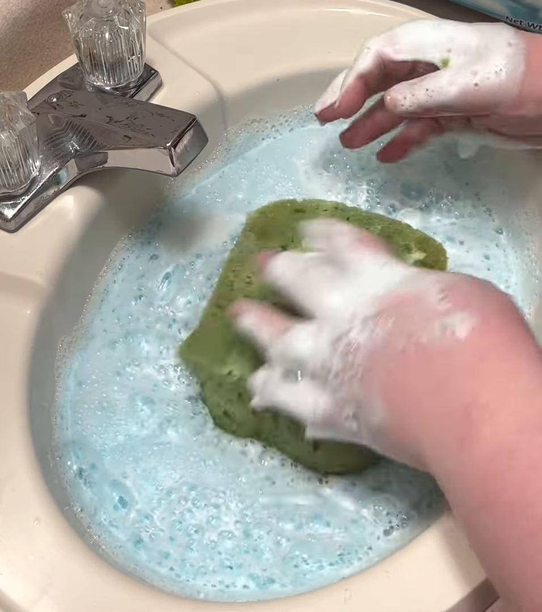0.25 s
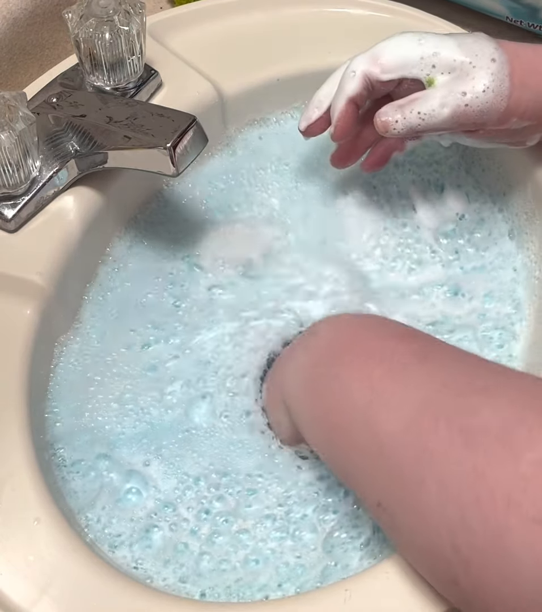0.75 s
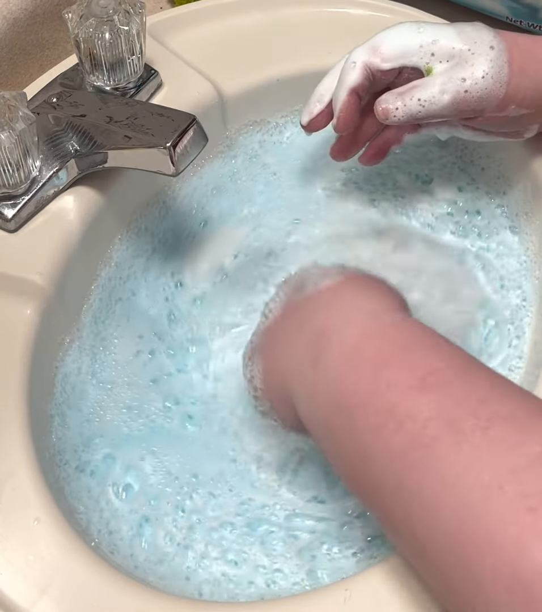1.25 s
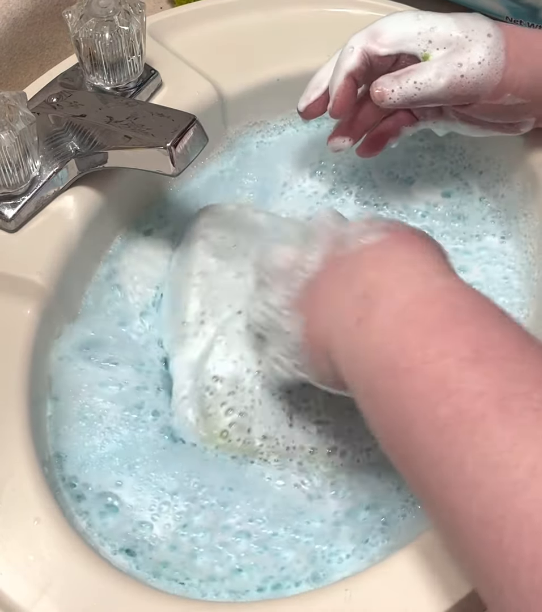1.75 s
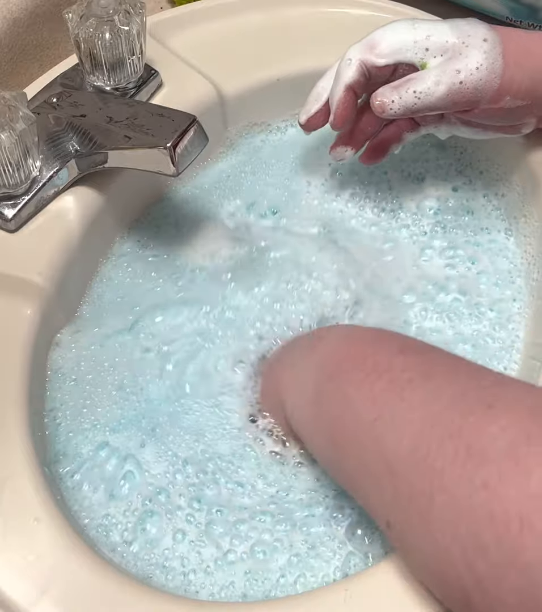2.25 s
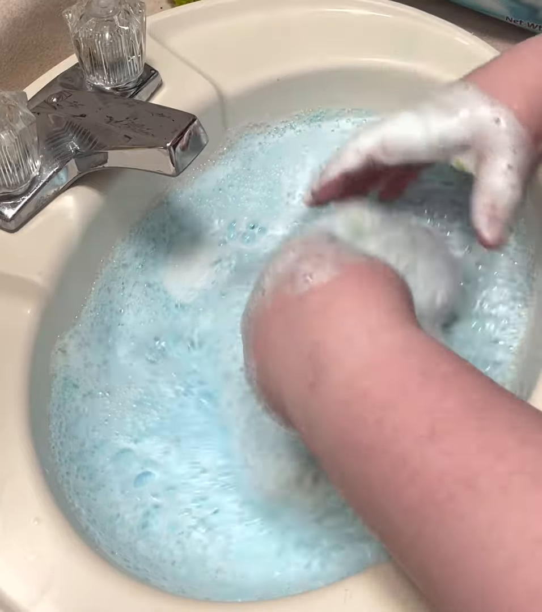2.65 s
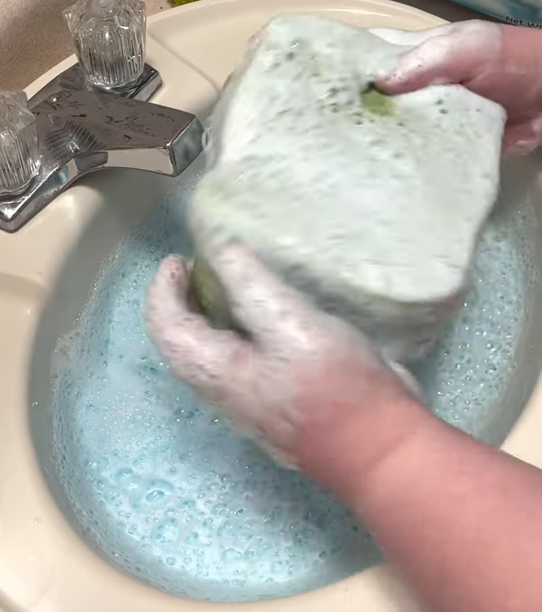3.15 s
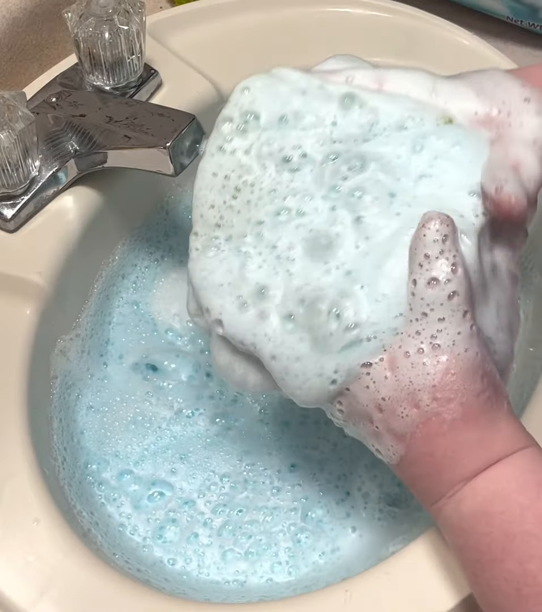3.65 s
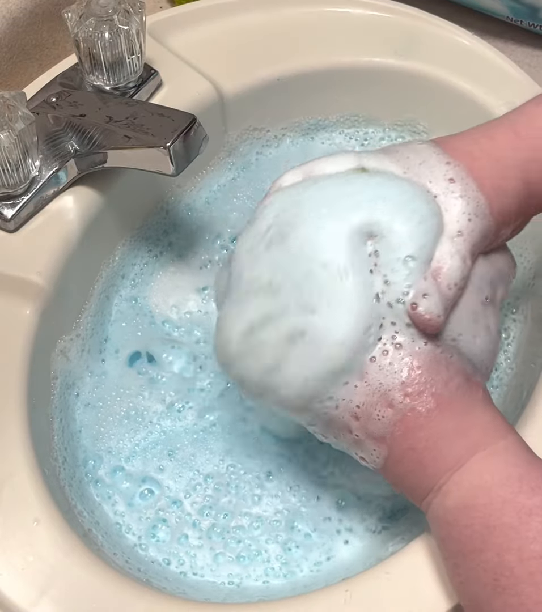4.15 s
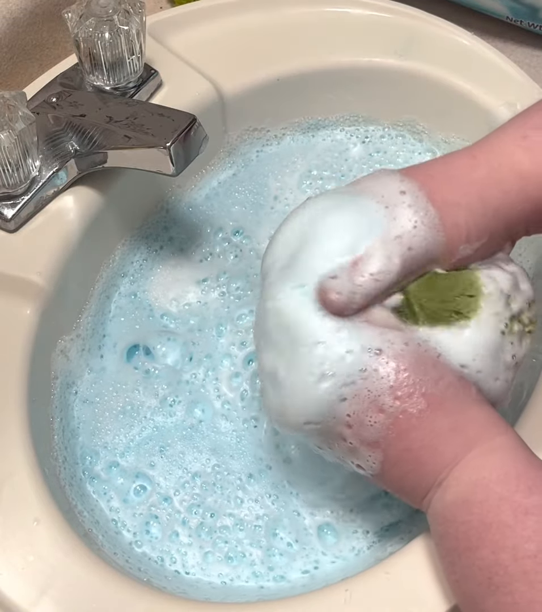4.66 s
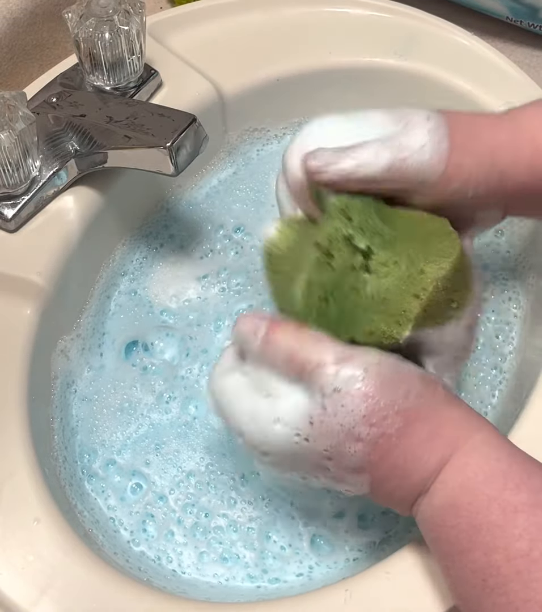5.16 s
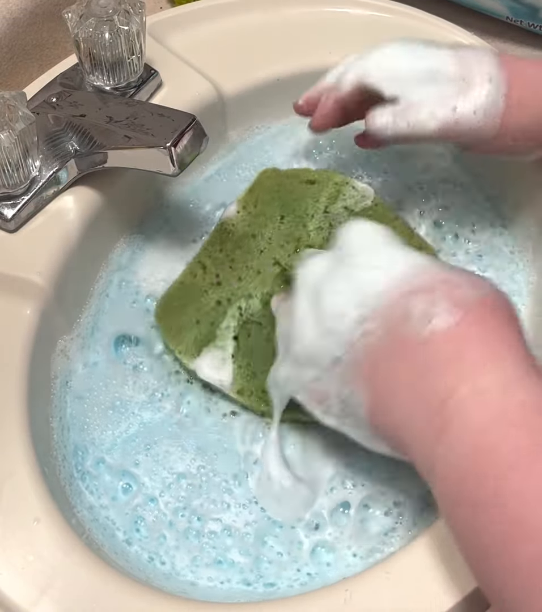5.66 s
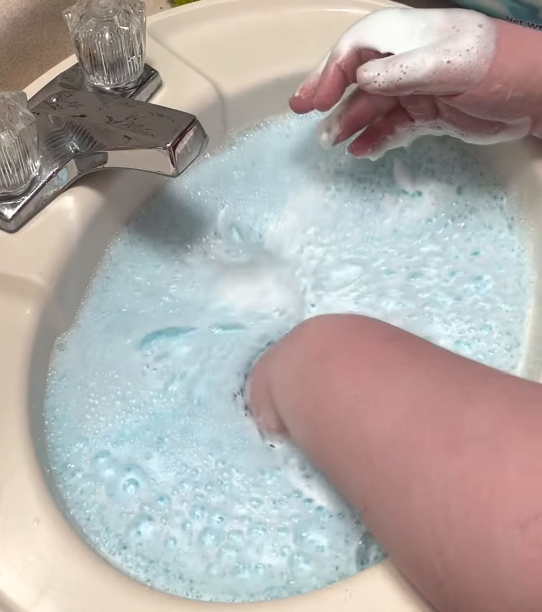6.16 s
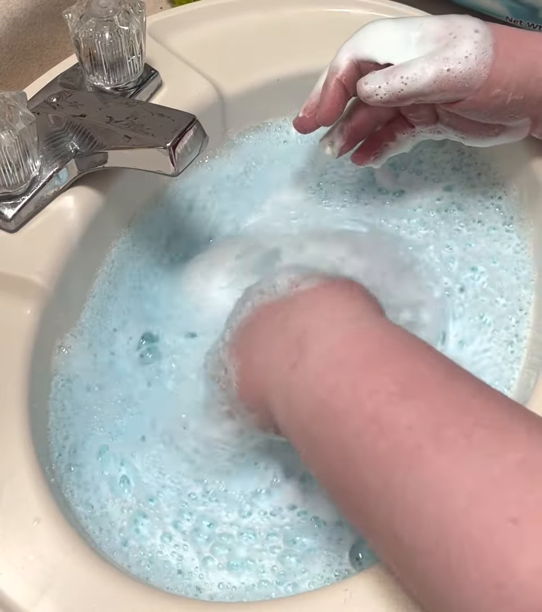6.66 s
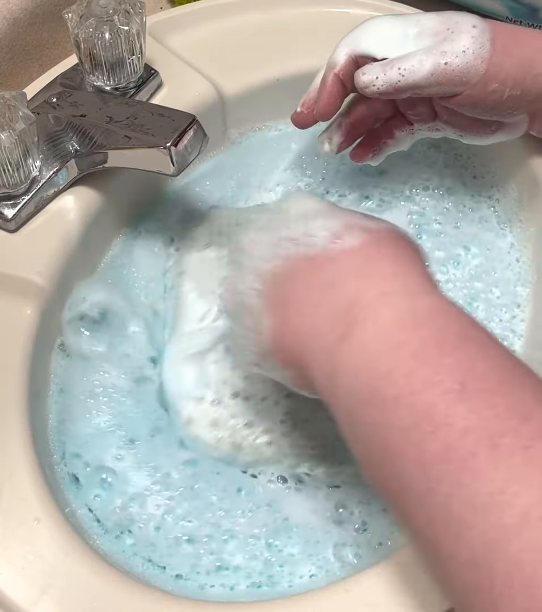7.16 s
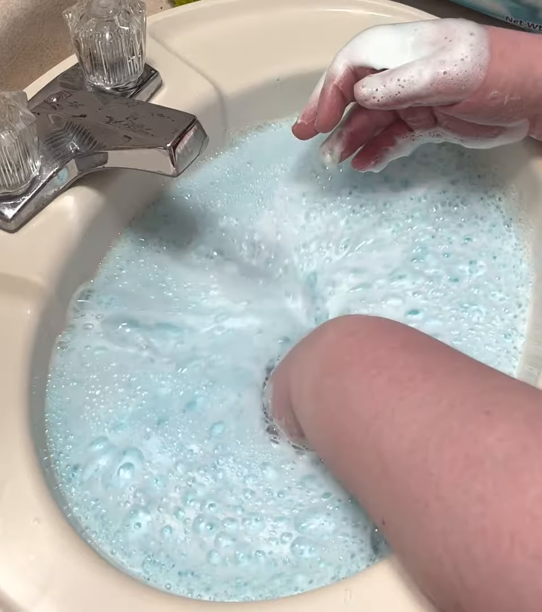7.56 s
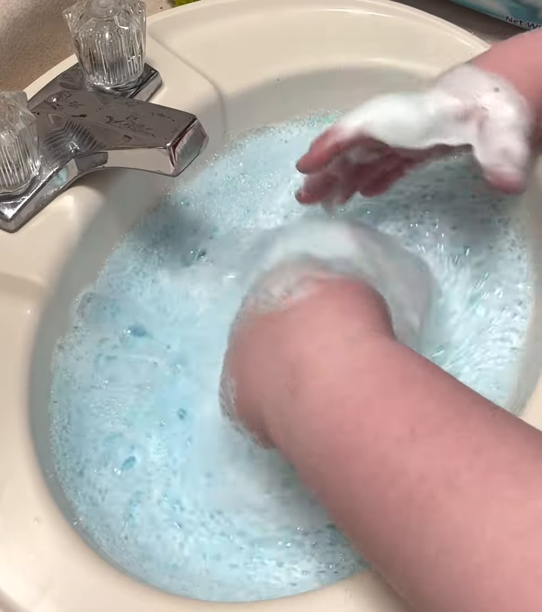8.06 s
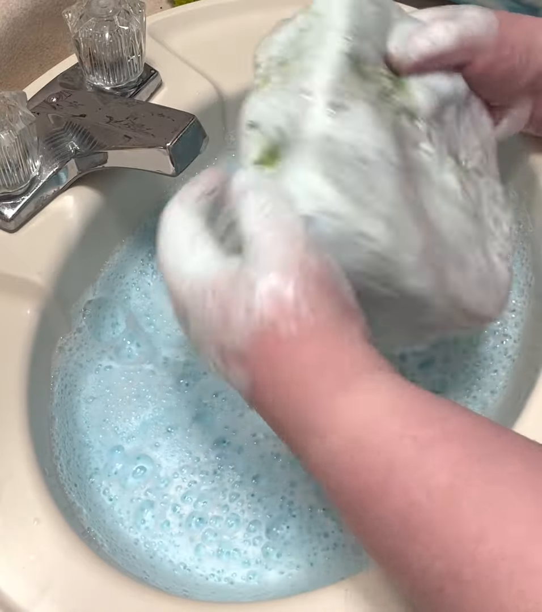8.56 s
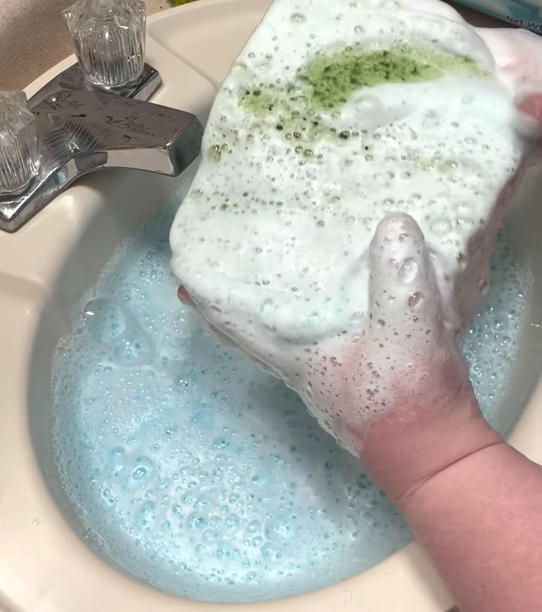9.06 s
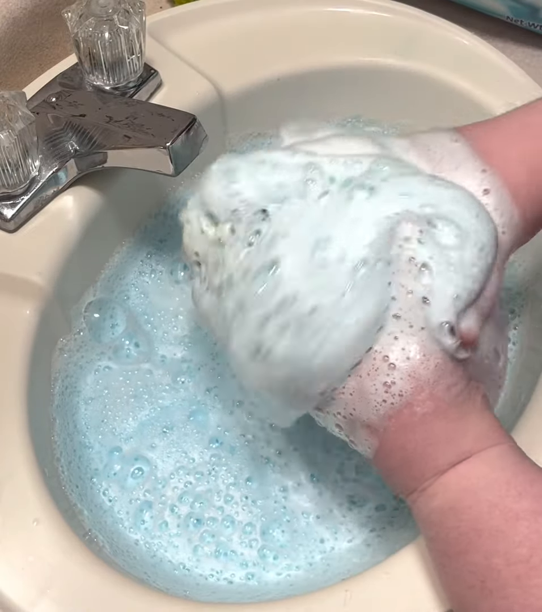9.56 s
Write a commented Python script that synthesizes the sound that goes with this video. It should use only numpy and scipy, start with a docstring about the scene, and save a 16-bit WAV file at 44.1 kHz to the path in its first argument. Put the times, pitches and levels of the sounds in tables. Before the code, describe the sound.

Close bathroom sink sounds: low watery booms, sloshes and plops as a sponge is dunked, then dense foamy squishing, popping bubbles and fine soap fizz.

```python
"""A deep gulp of trapped air and swirling water come first, over a low room murmur. A soaked sponge is
pressed under soapy water in a bathroom sink, lifted, and wrung out twice by hand, close to the ears.
Foam and fizz are random clicks, filtered or ringing as small bubbles; slow curves of the hand set their level.
Gulps, plops, glugs and pops are fading sine waves, with bursts of noise or clicks for slaps, snaps,
rushing water and spitting air. The basin rings, the bathroom echoes, and two microphone ports give stereo."""
import sys
import numpy as np
from scipy import signal
from scipy.fft import rfft, irfft, next_fast_len
from scipy.io import wavfile
from scipy.ndimage import map_coordinates

SR = 44100
rng = np.random.default_rng(int(sys.argv[2]) if len(sys.argv) > 2 else 0)


def output_pcm(signal):
    """Save a mono or channel-first signal as 16-bit PCM at the path in sys.argv[1].

    Samples are clipped to [-1, 1] before scaling.
    """
    pcm = np.clip(np.atleast_2d(signal).T, -1, 1) * 32767
    wavfile.write(sys.argv[1], SR, np.round(pcm).astype(np.int16))


N = 433062
TIME = np.arange(N) / SR
CONTROL_TIME = TIME[::64]  # the slow level curves need fewer points

# Levels in the tables are starting points: the functions below trim and mix them.
# air pockets under the sponge: (t/s, level/dB, settled pitch f/Hz)
GULPS = [(-.002, -30.5, 83), (0.398, -42.5, 78), (0.778, -28, 78), (0.965, -43.5, 79.4), (1.082, -46, 81),
         (1.691, -45.5, 78), (2.022, -39, 92), (2.242, -48, 77), (2.439, -51, 78), (2.912, -25, 71.5),
         (3.157, -46.5, 85), (3.359, -35.5, 77), (6.177, -28, 81.6), (6.262, -40, 78.6), (6.427, -50, 86),
         (7.145, -41, 91), (7.729, -44.5, 84), (7.85, -43.5, 88), (8.047, -45.5, 77), (8.818, -28.5, 80)]
# water rushing into an air pocket, its colour: (f/Hz, level/dB)
RUSH_COLOUR = [(100, -45), (250, 18), (500, 23.5), (800, 14), (1100, -1.5), (1600, -28), (3000, -41)]
# murmur of the building, its colour: (f/Hz, level/dB)
ROOM_HUM_COLOUR = [(20, -23), (33, -45), (46, 8), (65, 2.5), (77, 2.5), (95, 7.5), (140, -7), (250, -33.5),
                   (400, -37), (600, -29), (2000, -26), (12000, -52)]

# the hand stirs the water:
# (strongest t/s, build-up t/s, dying away t/s, slosh level/dB, level of foam carried along/dB)
SWIRLS = [(.01, 0.09, 0.032, -42.5, -56), (0.19, 0.072, 0.11, -50, -55.5), (0.424, 0.063, 0.098, -51, -65),
          (.785, 0.038, 0.036, -55.5, -76), (1.14, 0.2, 0.17, -53.5, -70), (2.02, 0.098, 0.1, -54, -63),
          (2.14, 0.099, 0.062, -58, -61.5), (2.18, 0.072, 0.053, -45, -67),
          (2.459, 0.089, 0.091, -48, -70.5), (3.0, 0.11, 0.063, -54, -64), (5.568, 0.023, 0.044, -52, -53),
          (5.881, 0.17, 1, -59, -88), (6.209, 0.032, 0.043, -47.5, -62), (6.54, 0.077, 0.12, -49.5, -72.5),
          (6.76, 0.075, 0.093, -58.5, -71.5), (7.485, 0.1, 0.16, -56, -59.5),
          (7.6, 0.065, 0.14, -54.5, -63.5), (7.73, 0.03, 0.049, -49.5, -69),
          (7.869, 0.035, 0.018, -49, -80), (8.02, 0.22, 0.038, -57.5, -92)]
SWIRL_SHAPE, SWIRL_BRIGHT_DB, SWIRL_FIZZ_DB = 1.3, -7.5, -16  # fizz relative to the foam
# the hand grips or pushes the sponge:
# (middle t/s, build-up t/s, let-go t/s, squelch level/dB, brightness: narrow over wide pores/dB)
PRESSES = [(.05, 0.19, 0.078, -56, 5), (.62, 0.29, 0.28, -62, 2), (1.58, 0.21, 0.19, -66, -4),
           (3.059, 0.056, 0.098, -59.5, 5), (3.27, 0.25, 0.18, -65.5, 7), (4.72, 0.25, 0.21, -62, -19),
           (4.84, 0.016, 0.029, -61.5, -0.5), (4.921, 0.052, 0.075, -60, -6), (5.379, 0.28, 0.22, -58, 3),
           (5.9, 0.15, 0.11, -63.5, 5), (6.111, 0.31, 0.16, -62.5, -3), (7.09, 0.35, 0.32, -68, -2),
           (8.29, 0.085, 0.08, -64.5, 10), (8.55, 0.13, 0.12, -58, 0), (8.779, 0.12, 0.12, -61, 1)]
PRESS_SHAPE, PRESS_FIZZ_DB, PRESS_SLOSH_DB = 2.33, -11, -3.5  # fizz and water relative to the squelch
# the released sponge draws air: (fullest t/s, build-up t/s, dying away t/s, fizz level/dB)
REFILLS = [(.06, 0.24, 0.2, -63), (.4, 0.012, 0.014, -71), (1.362, 0.36, 0.15, -73.5),
           (1.73, 0.067, 0.087, -75.5), (2.42, 0.04, 0.095, -78.5), (2.76, 0.33, 0.2, -70.5),
           (3.4, 0.044, 0.097, -75.5), (4.73, 0.16, 0.18, -65.5), (5.163, 0.12, 0.23, -54.5),
           (5.54, 0.12, 0.24, -69.5), (6.801, 0.27, 0.15, -73.5), (7.17, 0.061, 0.065, -72.5),
           (7.48, 0.086, 0.059, -85.5), (8.16, 0.32, 0.2, -73.5)]
REFILL_SHAPE, REFILL_SQUELCH_DB, REFILL_BRIGHT_DB = 1.17, 1.5, 9  # squelch relative to the fizz
# the two wrings, one curve each: (t/s, effort level/dB, lather fizz level/dB)
WRINGS = [
    [(3.49, -73, -89.5), (3.535, -64, -74), (3.586, -51, -58), (3.64, -47.5, -57), (3.738, -43.5, -58),
     (4.016, -42, -56.5), (4.134, -42.5, -54.5), (4.186, -44.5, -60.5), (4.408, -52.5, -66.5),
     (4.498, -62, -76), (4.55, -79, -81)],
    [(9.0, -69, -92), (9.038, -70.5, -81), (9.1, -63, -71.5), (9.155, -54.5, -64.5), (9.18, -53.5, -58.5),
     (9.23, -43.5, -52), (9.506, -41.5, -54), (9.576, -43, -61.5), (9.73, -42, -54.5), (9.748, -43, -63),
     (9.82, -47, -62)],
]
# added to effort, lather and effort; the squelch brightens steadily as the pores drain
WRING_SQUELCH_DB, WRING_FIZZ_DB, WRING_SLOSH_DB = -0.5, -5, -14.5
WRING_BRIGHT_DB, DRAIN_DB_PER_S = 1, 2.5
EDGE_DB = 13.5  # how far a stroke has fallen at the ends of its build-up and let-go
# water and lather never quite rest
REST_SQUELCH_DB, REST_BRIGHT_DB, REST_FIZZ_DB, REST_SLOSH_DB = -74.5, -4.5, -89, -69
# each plop churns the water briefly; level relative to the plop's table level
CHURN_DB, CHURN_S = -9.5, 0.02

# colours of the water and foam, all: (f/Hz, level/dB)
SLOSH_COLOUR = [(40, -8), (80, 3), (120, 7.5), (160, 4), (280, -9.5), (420, -4), (550, -8.5), (900, -20.5),
                (2000, -50)]  # churning water
WASH_COLOUR = [(300, -18), (800, -9), (1250, 3), (1650, -5), (2300, 8), (3500, 1), (4700, -1), (8000, -5),
               (12000, -38)]  # lather swept by rushing water
WIDE_COLOUR = [(70, -35.5), (150, -16), (240, -6.5), (450, -0.5), (700, 0), (1000, -8), (1400, -8),
               (2200, -20), (4000, -24.5), (12000, -55)]  # wide, flooded pores
NARROW_COLOUR = [(500, -20.5), (1200, -2), (2000, 1.5), (2600, 0), (3300, -5), (4500, -7.5), (7000, -13.5),
                 (12000, -38)]  # narrow, draining pores
BURSTING_COLOUR = [(150, -10), (600, 0), (1200, 2), (3000, -1), (12000, -10)]  # bubbles bursting out of the sponge
TEAR_COLOUR = [(100, -24), (300, 1), (1000, 9), (2400, -1.5), (4000, -10.5), (7000, -17), (12000, -53)]  # tearing wet films
FIZZ_COLOUR = [(600, -41.5), (1500, -1), (2800, 0), (4000, 0), (5200, 1), (6800, 2.5), (8400, 3.5),
               (9500, 4.5), (10800, 8), (11500, -2), (12400, -24.5)]  # snapping soap films

# water spatters off the sponge: (t/s, level/dB, dying away t/s)
SPATTERS = [(.03, -56, .05), (0.386, -55.5, 0.024), (.483, -65, 0.018), (1.485, -70, .05),
            (2.993, -64.5, 0.024), (3.04, -56, .02), (3.097, -65, .02), (6.962, -61.5, 0.037),
            (8.474, -57, 0.011), (8.54, -57, 0.027)]
SPATTER_RISE_S = 0.0029
# the sponge is thrust under and the water closes over it: (closing t/s, build-up t/s, level/dB)
PLUNGES = [(.725, 0.78, -66), (6.135, 0.24, -55.5)]
PLUNGE_CLOSE_S, PLUNGE_SHAPE = 0.083, 1.9

# cavities that close in the water with a slap:
# (t/s, body level/dB, body pitch f/Hz, slap level/dB, spray decay t/s, slap's upper edge f/Hz)
PLOPS = [(.182, -35, 320, -39.5, 0.012, 2600), (0.744, -40, 300, -45, 0.0036, 2500),
         (1.113, -40, 272, -47, 0.003, 850), (1.539, -55, 327, -45, 0.032, 2330),
         (1.5555, -32.5, 290, -39, 0.018, 2330), (1.598, -62, 330, -46, .012, 3120),
         (1.675, -34.5, 213, -49, 0.016, 1700), (2.018, -60, 256, -50.5, 0.027, 1860),
         (2.9051, -35.5, 234, -31.5, 0.006, 1010), (3.3, -43.5, 257, -54, 0.0034, 1500),
         (5.546, -38, 460, -42, 0.01, 2350), (5.565, -34, 327, -46, 0.0086, 1300),
         (6.176, -34.5, 247, -37, 0.0062, 955), (6.536, -46, 281, -47, 0.0034, 796),
         (7.046, -44.5, 296, -45.5, 0.011, 2490), (7.135, -42, 400, -35, 0.0045, 2000),
         (7.1419, -36.5, 260, -39.5, 0.012, 2000), (7.246, -37.5, 246, -39.5, 0.0034, 3830),
         (8.435, -44.5, 274, -39, 0.0068, 7000), (8.818, -35.5, 255, -33.5, 0.0021, 950)]
# slap and spray of a plop, their colour: (f/Hz, level/dB)
SPLASH_COLOUR = [(150, -16), (400, 12.5), (700, 8), (1200, 9), (2200, -2), (3500, 0.5), (6000, -13),
                 (12000, -48)]
# single larger bubbles bursting: (t/s, level/dB, pitch f/Hz)
POPS = [(.459, -45, 942), (.489, -43, 1050), (0.489, -47, 2270), (.625, -44, 2140), (.684, -48.5, 1114),
        (0.712, -45, 2370), (.744, -41, 1240), (1.602, -42, 2220), (2.021, -53, 1750), (2.03, -46, 1240),
        (2.125, -50, 1350), (2.85, -52.5, 1500), (2.994, -40.5, 1230), (3.042, -42, 2300),
        (3.072, -51, 1160), (3.1, -43, 1130), (3.563, -40.5, 2410), (3.617, -33, 1800), (3.769, -33, 1070),
        (3.781, -29, 1230), (3.85, -31, 1120), (3.897, -33, 933), (3.914, -33, 1120), (3.939, -27, 1080),
        (3.953, -29.5, 1356), (4.075, -32, 2100), (4.089, -33, 2240), (4.107, -31.5, 970),
        (4.12, -30, 2300), (4.683, -40, 5840), (4.793, -42, 785), (4.818, -36.5, 1030), (4.86, -43, 1100),
        (4.899, -39, 810), (4.908, -41.5, 760), (4.924, -47, 930), (4.949, -44, 810), (5.218, -38, 1160),
        (5.237, -37.5, 2060), (5.438, -37, 2500), (5.866, -40.5, 2210), (5.992, -42.5, 1180),
        (6.034, -45, 1170), (6.075, -52, 1150), (6.124, -48, 2230), (7.049, -52, 2340), (7.05, -52, 990),
        (7.062, -51, 2300), (7.146, -36.5, 1750), (7.2454, -41, 1230), (7.247, -42, 2500),
        (7.471, -48, 1080), (7.496, -52, 1074), (7.617, -50, 1190), (8.314, -45, 1220), (8.476, -46, 2350),
        (8.546, -45, 1110), (8.646, -47.5, 1110), (8.794, -42, 2450), (9.171, -34, 880), (9.352, -31, 1165),
        (9.371, -32.5, 2410), (9.41, -36, 2066), (9.471, -33, 2485), (9.509, -31, 1240), (9.545, -33, 1030),
        (9.703, -32, 950), (9.715, -32, 1073), (9.726, -32, 2430)]
# large bubbles that wobble up past the arm or bulge out of the sponge: (t/s, level/dB, starting pitch f/Hz)
GLUGS = [(1.054, -50.5, 290), (1.127, -42, 197), (1.144, -43.5, 247), (1.160, -44, 205), (1.178, -48, 200),
         (1.212, -52, 217), (1.683, -42, 285), (2.135, -45, 199), (2.156, -36.5, 262), (2.176, -37.5, 240),
         (2.189, -43, 195), (2.21, -46.5, 258), (2.411, -46, 233), (2.435, -38, 277), (2.463, -35, 275),
         (2.477, -37.5, 165), (3.043, -50, 304), (3.714, -39.5, 307), (3.777, -37.5, 274),
         (3.929, -38, 391), (3.948, -41, 354), (4.072, -40, 295), (5.549, -44, 695), (5.558, -41, 400),
         (5.573, -40.5, 207), (6.211, -43.5, 250), (6.228, -44.5, 207), (6.326, -48.5, 194),
         (6.44, -47, 185), (6.515, -48, 206), (6.547, -48.5, 195), (6.561, -51, 207), (6.585, -49, 245),
         (6.703, -50.5, 178), (7.46, -52, 277), (7.603, -46.5, 290), (7.616, -39.5, 290), (7.724, -53, 232),
         (7.858, -40.5, 263), (7.870, -56, 222), (7.958, -50, 197), (8.004, -63, 187), (8.041, -47.5, 169),
         (9.176, -39.5, 290), (9.214, -38.5, 293), (9.272, -41, 285), (9.306, -39, 350), (9.34, -37.5, 315),
         (9.351, -44, 282), (9.406, -41.5, 365), (9.454, -38.5, 300), (9.491, -45.5, 300),
         (9.587, -41, 310), (9.703, -42, 292)]
# jets of air that spit through the lather: (t/s, level/dB, decay t/s)
SPITS = [(2.036, -56, 0.0034), (2.848, -55, 0.008), (4.028, -43, 0.0041), (4.053, -44, 0.004),
         (4.089, -33, 0.0022), (4.1, -39, 0.0056), (4.116, -41, 0.0051), (4.135, -34, 0.0058),
         (4.154, -40.5, 0.0088), (8.279, -57.5, 0.017), (8.312, -52.5, 0.0053), (8.435, -42.5, 0.0017)]
# reedy colour of the air jets: (f/Hz, level/dB)
SPIT_COLOUR = [(1000, -29), (2200, -27), (3500, -3), (4900, 2.5), (5700, 4.5), (6300, -8), (6950, 8),
               (8000, -11), (9800, 1), (11100, 0.5), (12400, -38)]

# resonances of the basin and the hollows between them: (f/Hz, width f/Hz, level/dB)
BASIN = [(165, 25, -0.5), (256, 59, 10), (291.3, 21.4, 8), (402, 71, 5.5), (524, 30, -5), (561.4, 7.3, 4.5),
         (785, 37, 3.5), (910, 28, 5.5), (1020, 85, 3), (1160, 70, 1.5), (1317, 64, 0.5), (1583, 21, 6),
         (1896, 24, -1.5), (2124, 80, 0.5), (2300, 79, 2), (2360, 35, 0), (2870, 79, 3.5), (3090, 170, 3),
         (3360, 34, 3.5), (4350, 150, 2), (5130, 140, -3), (5720, 220, 0.5), (6830, 91, 1.5)]
# low modes of the filled basin, rung by large bubbles: (f/Hz, width f/Hz, level/dB)
BASIN_MODES = [(77, 10, 8), (154.7, 15.3, -2), (274, 18, -8), (395, 34, -5.5), (558, 16, -7.5)]
# reverberation of the bathroom: (f/Hz, time to fade by 60 dB t/s)
WALLS = [(80, 1), (300, 0.04), (1000, 0.37), (4000, 0.14), (12000, 0.21)]
# how alike the two microphone ports hear: (f/Hz, likeness 0 to 1)
LIKENESS = [(100, 0.99), (270, 0.96), (420, 0.66), (620, 0.26), (850, 0.43), (1200, 0.83), (2000, 1),
            (3200, 0.44), (4500, 0.55), (5900, 0.99), (7500, 1), (11000, 1)]
# left port over right port: (f/Hz, level/dB)
BALANCE = [(100, 0), (160, .5), (260, 2.5), (420, 3), (700, .5), (1100, -1.5), (1800, .5), (4700, -.7),
           (7600, 0)]
# how far the left port leads: (f/Hz, phase/rad)
LEAD = [(200, 0), (600, -.4), (1500, .05), (3500, .55), (4400, 1.5), (5200, 4.6), (5800, 6.2), (7200, 7.7),
        (9050, 3 * np.pi), (10500, 10.7), (12000, 12.5)]
EDGE_HZ = 12900


def amp(db):
    """Turns decibels into a gain."""
    return 10 ** (np.asarray(db) / 20)


def unit(x):
    """Scales a sound to an average (rms) strength of 1."""
    return x / np.sqrt(np.mean(x ** 2) + 1e-20)


def read(points, hz):
    """Reads a table between its points, on a log-frequency axis."""
    f, value = np.transpose(points)
    return np.interp(np.log(hz + 1), np.log(f + 1), value)


def add(mix, s, sound):
    """Mixes a sound in at time s, in seconds."""
    part = mix[max(round(s * SR), 0):][:len(sound)]
    part += sound[:len(part)]


def colour(x, spectrum, size=4096):
    """Filters a source to its own colour, shaped further by the basin."""
    hz = abs(np.fft.fftfreq(size, 1 / SR))
    db = read(spectrum, hz)
    db = db + sum(g / (1 + (2 * (hz - f) / width) ** 2) for f, width, g in BASIN)
    # minimum phase: the filter sounds as promptly as its spectrum allows
    response = np.exp(np.conj(signal.hilbert(np.log(amp(db)))))
    ring = np.fft.ifft(response).real[:size // 2]
    return signal.oaconvolve(x, ring / np.linalg.norm(ring))[:len(x)]


def hollow(x, direct_db=-2):
    """The filled basin's low modes ring on after each large bubble."""
    out = amp(direct_db) * x
    for hz, width, db in BASIN_MODES:
        b, a = signal.iirpeak(hz, hz / width, SR)
        out = out + amp(db) * signal.lfilter(b, a, x)
    return out


def wander(per_s):
    """Random motion of rms 1, in straight lines between per_s points a second."""
    knots = rng.standard_normal(N // 40)
    return unit(map_coordinates(knots, [TIME * per_s], order=1, mode="wrap"))


def bursts(per_s, spread_db):
    """Random clicks of steady mean power; a larger spread makes their sizes differ more."""
    size = amp(spread_db * np.minimum(rng.exponential(1, N), 4.5))
    sign = rng.choice([-1, 1], N)
    happens = rng.random(N) < per_s / SR
    return unit(size * sign * happens / np.sqrt(per_s))


def bubbles(clicks, low_hz, high_hz, cycles, rise, count=24):
    """Each click rings a bubble of random size, whose pitch rises as it nears the surface."""
    kind, out = rng.integers(0, count, N), np.zeros(N)
    for k, hz in enumerate(np.geomspace(low_hz, high_hz, count)):
        age = np.arange(0, 5, hz / cycles / SR)  # in decay times
        ring = np.exp(-age) * np.sin(2 * np.pi * cycles * age * (1 + rise * age))
        out += signal.oaconvolve(clicks * (kind == k), ring / np.linalg.norm(ring))[:N]
    return unit(out)


def gulps(sag=1.93, sag_s=0.0048, swell_s=0.014, echo_s=0.0524, echo_db=-7, ring_hz=76, ring_db=-13):
    """A big air pocket booms, dropping in pitch; its echo comes back from the room and the sink rings on."""
    t, out = np.arange(SR // 2) / SR, np.zeros(N)
    ring = (1 - np.exp(-t / .02)) * np.exp(-t / .075) * np.sin(2 * np.pi * ring_hz * t)
    for s, db, hz in GULPS:
        turns = hz * (t + sag * sag_s * (1 - np.exp(-t / sag_s)))
        swell = (t / swell_s * np.exp(1 - t / swell_s)) ** 1.56
        boom = amp(db) * swell * np.sin(2 * np.pi * turns)
        add(out, s, boom)
        add(out, s + echo_s, amp(echo_db) * boom + amp(db + ring_db) * ring)
    return out


def rush(rush_db=-24, rush_s=0.027, delay_s=0.00263):
    """Water tumbles into the space of each air pocket: a fading burst of noise."""
    t, out = np.arange(SR // 5) / SR, np.zeros(N)
    for s, db, hz in GULPS:
        tumble = np.exp(-t / rush_s) * rng.standard_normal(len(t))
        add(out, s + delay_s, amp(db + rush_db) * tumble)
    return colour(out, RUSH_COLOUR)


def room_hum(db=-63):
    """The low steady murmur of the building: filtered noise."""
    hz = np.fft.rfftfreq(N, 1 / SR)
    shaped = rfft(rng.standard_normal(N)) * amp(read(ROOM_HUM_COLOUR, hz))
    return amp(db) * unit(irfft(shaped, N))


def stroke(s, rise, fall, shape):
    """Level in dB of a movement that builds up to time s and dies away; a higher shape is flatter on top."""
    away = np.maximum((s - CONTROL_TIME) / rise, (CONTROL_TIME - s) / fall)
    return -EDGE_DB * np.minimum(away, 12) ** shape


def hands():
    """Sums the power of all movements into four gain curves: wide pores, narrow pores, fizz and slosh."""
    t = CONTROL_TIME

    def drive(squelch_db, bright_db, fizz_db, slosh_db):
        """Power of one movement; brightness splits its squelch between wide and narrow pores."""
        wide = amp(squelch_db) / np.hypot(1, amp(bright_db))
        gains = np.array([wide, wide * amp(bright_db), amp(fizz_db), amp(slosh_db)])
        return gains.reshape(4, -1) ** 2

    power = np.zeros(len(t)) + drive(REST_SQUELCH_DB, REST_BRIGHT_DB, REST_FIZZ_DB, REST_SLOSH_DB)
    for s, rise, fall, db, foam_db in SWIRLS:
        level = stroke(s, rise, fall, SWIRL_SHAPE)
        foam = level + foam_db
        power += drive(foam, SWIRL_BRIGHT_DB, foam + SWIRL_FIZZ_DB, level + db)
    for s, rise, fall, db, bright in PRESSES:
        level = db + stroke(s, rise, fall, PRESS_SHAPE)
        power += drive(level, bright, level + PRESS_FIZZ_DB, level + PRESS_SLOSH_DB)
    for s, rise, fall, db in REFILLS:
        level = db + stroke(s, rise, fall, REFILL_SHAPE)
        power += drive(level + REFILL_SQUELCH_DB, REFILL_BRIGHT_DB, level, level - np.inf)  # no slosh
    for s, db, *_ in PLOPS:
        churn = (t > s) * np.exp(-abs(t - s) / CHURN_S)
        power[-1] += (amp(db + CHURN_DB) * churn) ** 2
    for curve in WRINGS:
        s, effort, lather = np.transpose(curve)
        effort = np.interp(t, s, effort, left=-200, right=-200)
        lather = np.interp(t, s, lather, left=-200, right=-200)
        bright = WRING_BRIGHT_DB + DRAIN_DB_PER_S * (t - s[0])
        power += drive(effort + WRING_SQUELCH_DB, bright, lather + WRING_FIZZ_DB, effort + WRING_SLOSH_DB)
    return [np.interp(TIME, t, np.sqrt(p)) for p in power]


def slosh(stir):
    """Water churns round the hand in lumps, with large, low bubbles in it."""
    churn = unit(colour(bursts(per_s=700, spread_db=0.5), SLOSH_COLOUR))
    gurgle = bubbles(bursts(per_s=85, spread_db=1.0), low_hz=150, high_hz=290, cycles=3.4, rise=.025, count=10)
    lumps = amp(2.0 * wander(per_s=39))
    return hollow(stir * lumps * (amp(-1.5) * churn + amp(-1.5) * gurgle))


def splashing():
    """Lather and droplets thrown about as the sponge goes in and comes out."""
    t = CONTROL_TIME
    power = np.zeros(len(t))
    for s, rise, db in PLUNGES:
        power += amp(db + stroke(s, rise, PLUNGE_CLOSE_S, PLUNGE_SHAPE)) ** 2
    for s, db, fall in SPATTERS:
        spatter = np.clip((t - s) / SPATTER_RISE_S, 0, 1) * np.exp(-abs(t - s) / fall)
        power += (amp(db) * spatter) ** 2
    lather = unit(colour(bursts(per_s=2000, spread_db=3.5), WASH_COLOUR))
    drops = bubbles(bursts(per_s=200, spread_db=1.8), low_hz=1000, high_hz=2600, cycles=7, rise=.03, count=14)
    return np.interp(TIME, t, np.sqrt(power)) * (amp(-5.0) * lather + amp(-7.5) * drops)


def squelch(flow, bright):
    """Foam forced through the pores: the harder the squeeze, the more bubbles break, in flurries."""
    effort = flow / flow.max()
    per_s = 600 + 4500 * effort

    wide = amp(-1.0) * unit(colour(bursts(per_s * .5, spread_db=0.4), WIDE_COLOUR))
    flurry = amp(2 * wander(per_s=60) - .5)
    clicks = bursts(per_s * .11, spread_db=1.2)
    ringing = bubbles(clicks, low_hz=760, high_hz=1400, cycles=7, rise=.02, count=14)
    wide += amp(-4.5) * flurry * unit(colour(ringing, BURSTING_COLOUR))
    clicks = bursts(per_s * 0.015, spread_db=0.0)
    low_ringing = bubbles(clicks, low_hz=215, high_hz=413, cycles=2.8, rise=0.058, count=6)
    wide += amp(-9.0) * unit(hollow(low_ringing))

    narrow = amp(-4.0) * unit(colour(bursts(per_s, spread_db=1.0), NARROW_COLOUR))
    flurry = amp(2 * wander(per_s=60) - .5)
    clicks = bursts(per_s * .12, spread_db=1.2)
    ringing = bubbles(clicks, low_hz=1800, high_hz=2500, cycles=11, rise=.012, count=12)
    narrow += amp(-6.5) * flurry * unit(colour(ringing, BURSTING_COLOUR))

    # sparser than the bubbles, whole wet films tear with a crackle
    tears = amp(-11.5) * unit(colour(bursts(70 + 200 * effort, spread_db=1.3), TEAR_COLOUR))
    surge = amp(.5 * wander(per_s=16) + .8 * wander(per_s=88))
    pores = (wide + bright * narrow) / np.hypot(1, bright)
    return flow * amp(0.23) * surge * (pores + tears)


def fizz(flow, foam):
    """Tiny soap films snap as the sponge draws air and the lather settles."""
    films = colour(bursts(1800 + 7000 * flow / flow.max(), spread_db=-2.0), FIZZ_COLOUR)
    # a flooded sponge, with much more foam than fizz, muffles its finest films
    flooded = np.clip((20 * np.log10(foam / flow) - 6) / 16, 0, 1)
    muffled = signal.sosfilt(signal.butter(1, 7000, fs=SR, output="sos"), films)
    flicker = amp(7.5 + 2.0 * wander(per_s=51))
    return flow * flicker * unit(films + flooded * (muffled - films))


def water(wide, narrow, lather, stir):
    """All the small bubbles of foam and water at once."""
    foam = np.hypot(wide, narrow)
    return slosh(stir) + splashing() + squelch(foam, narrow / wide) + fizz(lather, foam)


def plops(body_db=-1, cycles=0.69, sag=0.09, slap_db=5, spray_db=-1.0, drops_per_s=7000):
    """A wet slap and spray ring in the closing cavity, whose hollow note sinks in pitch."""
    t, body, slaps = np.arange(SR // 8) / SR, np.zeros(N), np.zeros(N)
    for s, db, hz, crack_db, decay_s, edge_hz in PLOPS:
        age = t * hz / cycles
        turns = cycles * (age * (1 - sag / 3) + sag * (1 - np.exp(-age)))
        add(body, s, amp(db + body_db) * age * np.exp(1 - age) * np.sin(2 * np.pi * turns))
        drops = unit(rng.choice([-1, 1], len(t)) * (rng.random(len(t)) < drops_per_s / SR))
        spray = amp(spray_db) * np.exp(-t / decay_s) * drops
        spray[0] = amp(slap_db)  # the slap is one strong click
        cavity = signal.cheby1(3, 4, edge_hz, fs=SR, output="sos")  # low-pass with a resonant edge
        add(slaps, s, amp(crack_db) * signal.sosfilt(cavity, spray))
    return hollow(body) + colour(slaps, SPLASH_COLOUR)


def pops(ring_db=-2, snap_db=-10, cycles=2.0, snap_s=0.00069):
    """A larger film snaps and its cavity rings for a few cycles; low-pitched ones snap more softly."""
    t, rings, snaps = np.arange(SR // 20) / SR, np.zeros(N), np.zeros(N)
    for s, db, hz in POPS:
        ring = np.exp(-t * hz / cycles) * np.sin(2 * np.pi * hz * t)
        add(rings, s, amp(db + ring_db) * ring)
        snap = np.exp(-t / snap_s) * rng.standard_normal(len(t))
        add(snaps, s, amp(db + snap_db) * min(hz / 2000, 1) * snap)
    return rings + colour(snaps, FIZZ_COLOUR)


def glugs(cycles=1.1, rise=0.025):
    """A large bubble swells and rings for a few cycles, rising a little in pitch."""
    t, out = np.arange(SR // 8) / SR, np.zeros(N)
    for s, db, hz in GLUGS:
        age = t * hz / cycles
        turns = cycles * age * (1 + rise * age)
        add(out, s, amp(db) * age * np.exp(1 - age) * np.sin(2 * np.pi * turns))
    return hollow(out)


def spits(open_s=0.0003):
    """A pore opens and lets out a short hiss of air."""
    t, out = np.arange(SR // 20) / SR, np.zeros(N)
    for s, db, decay_s in SPITS:
        puff = (1 - np.exp(-t / open_s)) * np.exp(-t / decay_s)
        add(out, s, amp(db) * puff * rng.standard_normal(len(t)))
    return colour(out, SPIT_COLOUR)


def bathroom(x, wet_db=-12, turns_per_s=2.3):
    """Adds a small hard room's tail; two random sets of reflections take turns, evening out its colour."""
    out, turn = x, 2 * np.pi * turns_per_s * TIME  # the turns come at a steady rate
    for share in (np.cos(turn), np.sin(turn)):
        happens = rng.random(SR // 2) < 3000 / SR
        taps = rng.standard_normal(SR // 2) * happens * (TIME[:SR // 2] > .005)
        # each pitch fades at its own rate
        hz, t, z = signal.stft(taps, SR, nperseg=256)
        fade = amp(-60 * t / read(WALLS, hz)[:, None])
        tail = signal.istft(z * fade, SR)[1]
        out = out + amp(wet_db) * signal.oaconvolve(x * share, tail / np.linalg.norm(tail))[:N]
    return out


def ports(centre, scatter):
    """Two ports hear the sink out of step, plus opposite shares of bubbles scattered round the bowl."""
    size = next_fast_len(N + SR // 4)
    hz, sides = np.fft.rfftfreq(size, 1 / SR), np.array([[1], [-1]])  # left, right
    same = np.clip(read(LIKENESS, hz), 0, 1)
    shared = rfft(centre, size) * np.sqrt((1 + same) / 2)
    opposite = sides * rfft(scatter, size) * np.sqrt((1 - same) / 2)
    balance = amp(sides * read(BALANCE, hz) / 2)
    lead = np.exp(.5j * sides * read(LEAD, hz))
    return irfft((shared + opposite) * balance * lead, size)[:, :N]


def scene():
    """Sponge, foam and water in the sink."""
    work = hands()
    single_events = rush() + plops() + pops() + glugs() + spits()
    centre = bathroom(water(*work) + single_events) + gulps() + room_hum()
    scatter = bathroom(water(*work))  # a fresh draw of the same small bubbles
    return ports(centre, scatter)


def record(dry):
    """Cuts the treble above EDGE_HZ, the recorder's band limit."""
    low_pass = signal.firwin(511, EDGE_HZ, window=("kaiser", 9), fs=SR)
    return signal.oaconvolve(dry, low_pass[None], "same")


dry = scene()
out = record(dry)
output_pcm(out)
```